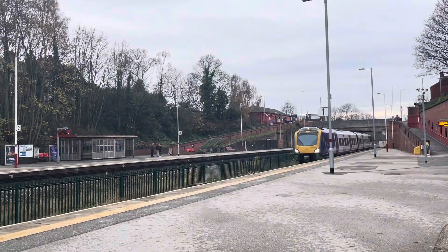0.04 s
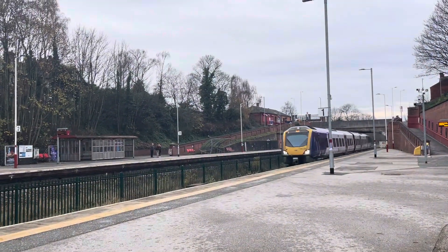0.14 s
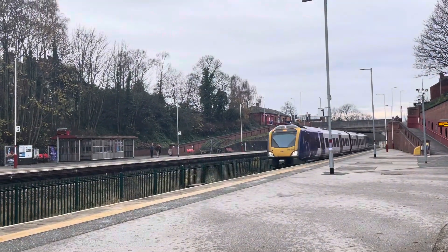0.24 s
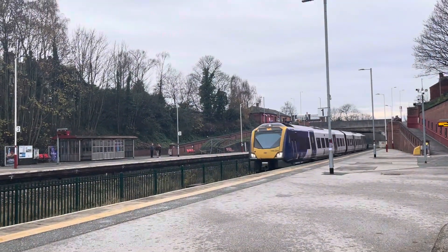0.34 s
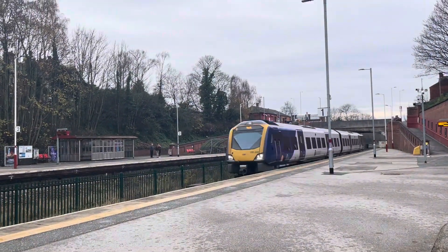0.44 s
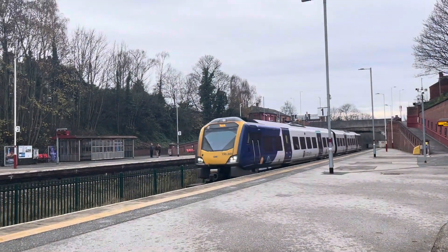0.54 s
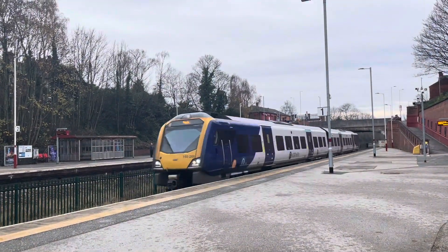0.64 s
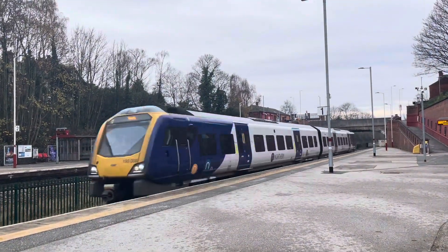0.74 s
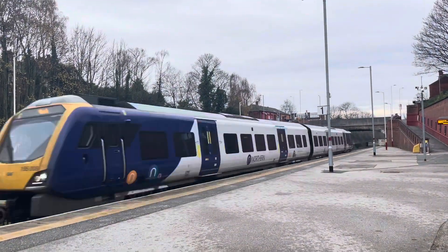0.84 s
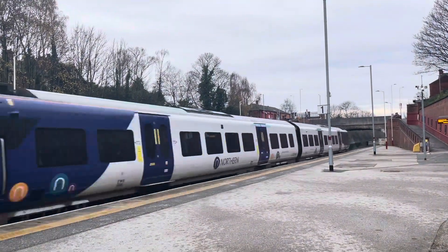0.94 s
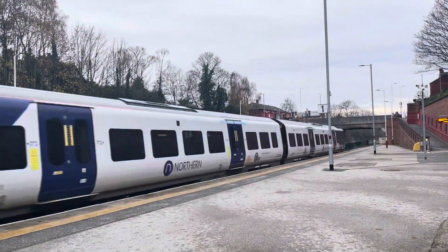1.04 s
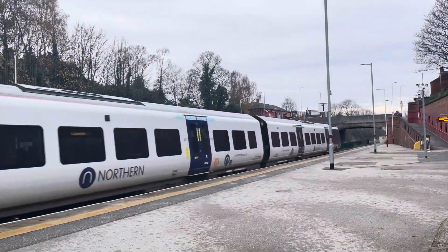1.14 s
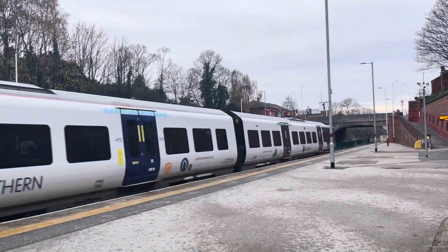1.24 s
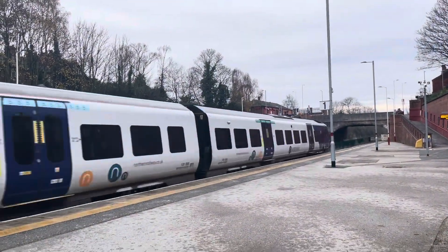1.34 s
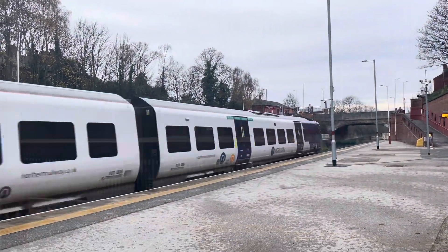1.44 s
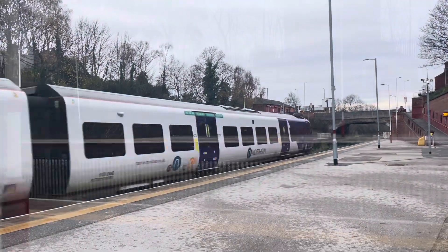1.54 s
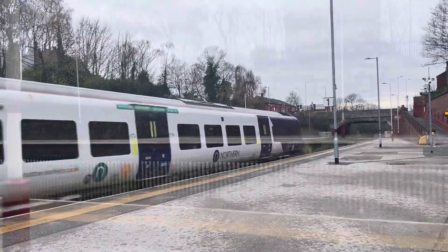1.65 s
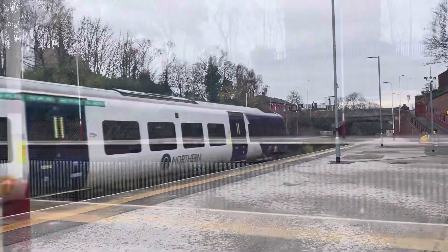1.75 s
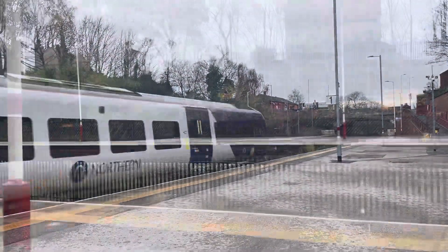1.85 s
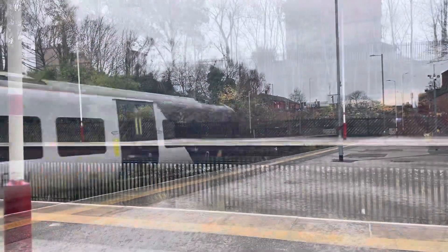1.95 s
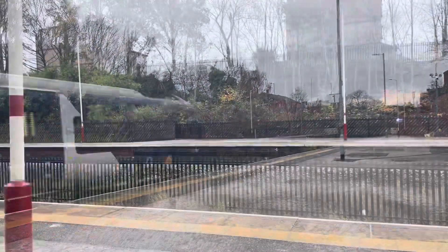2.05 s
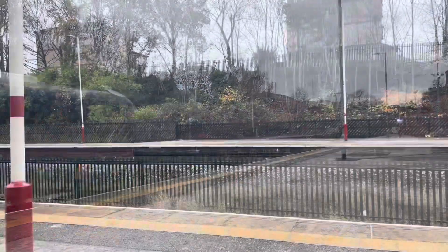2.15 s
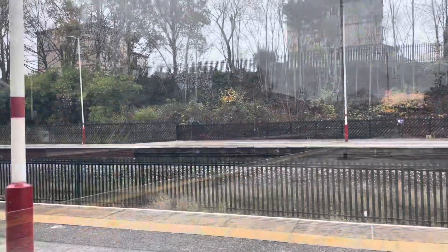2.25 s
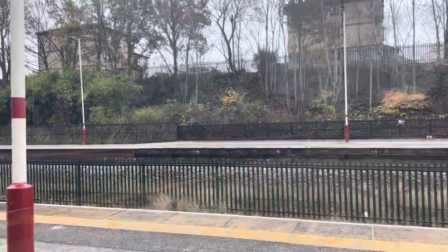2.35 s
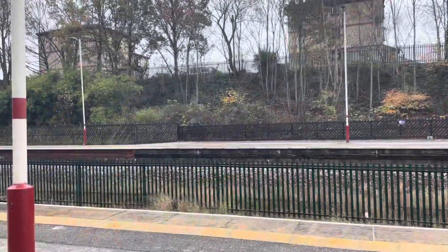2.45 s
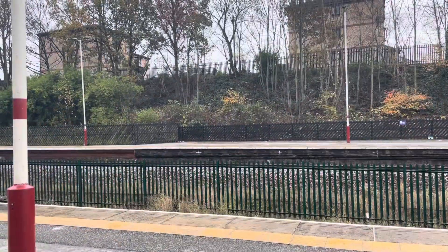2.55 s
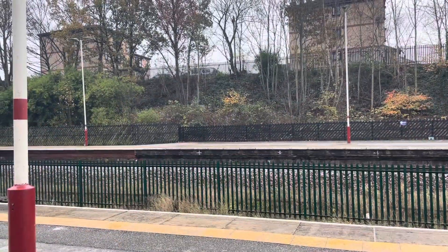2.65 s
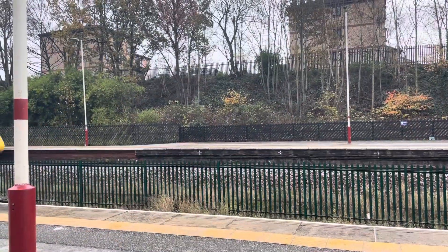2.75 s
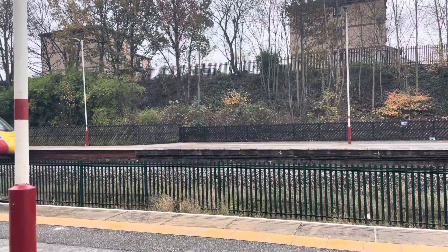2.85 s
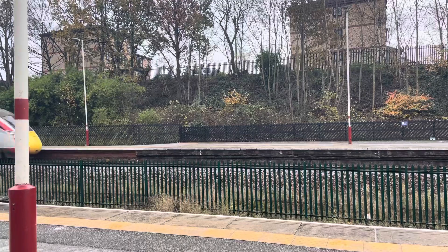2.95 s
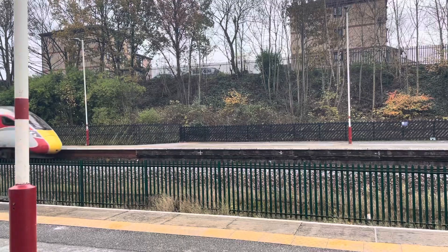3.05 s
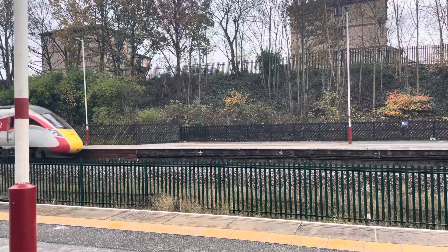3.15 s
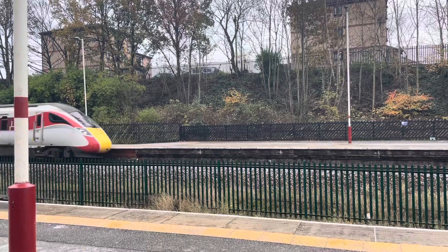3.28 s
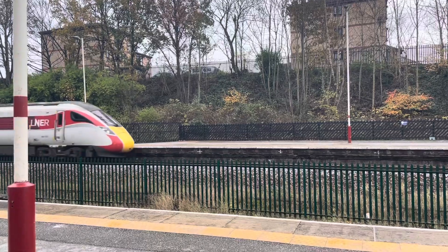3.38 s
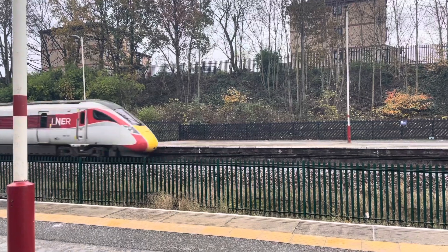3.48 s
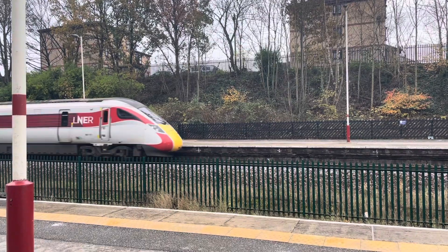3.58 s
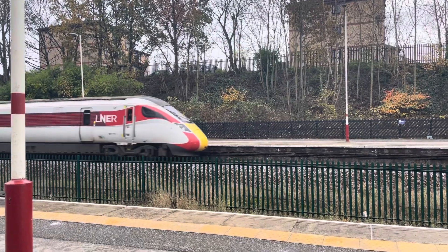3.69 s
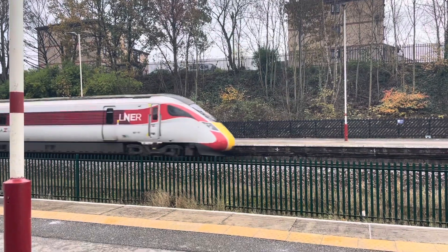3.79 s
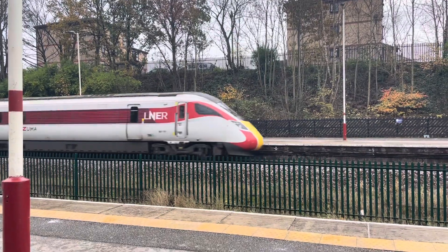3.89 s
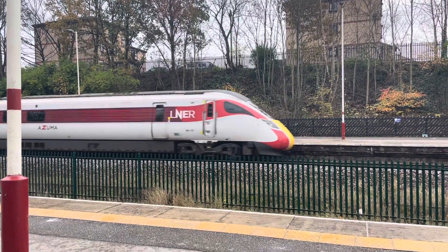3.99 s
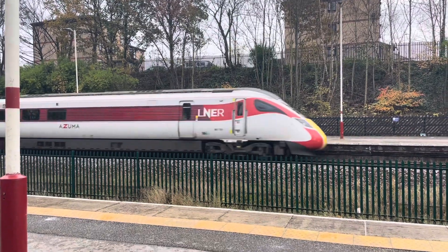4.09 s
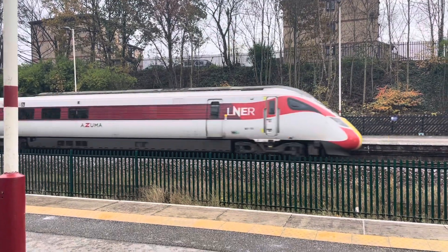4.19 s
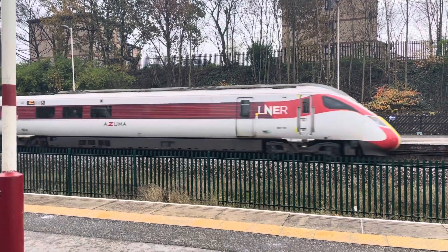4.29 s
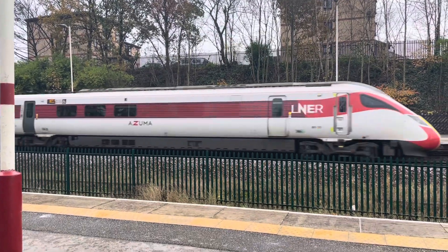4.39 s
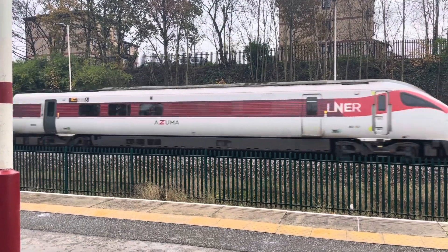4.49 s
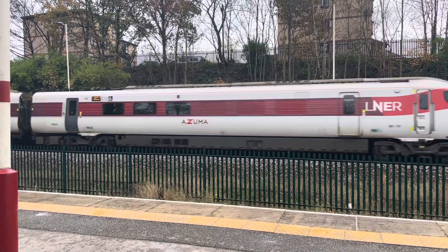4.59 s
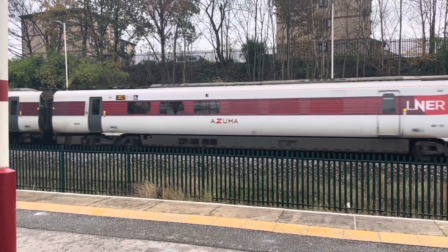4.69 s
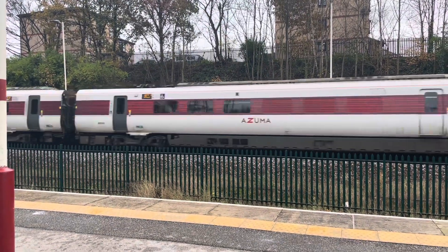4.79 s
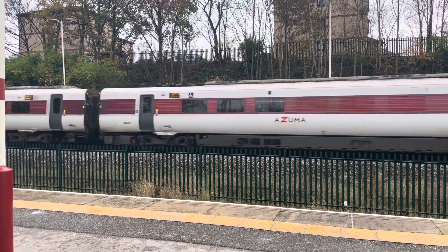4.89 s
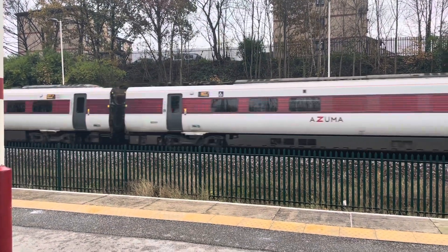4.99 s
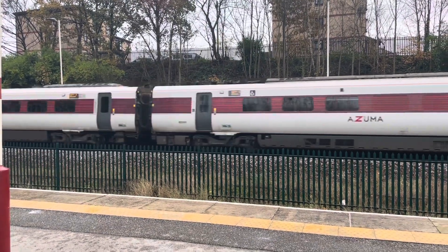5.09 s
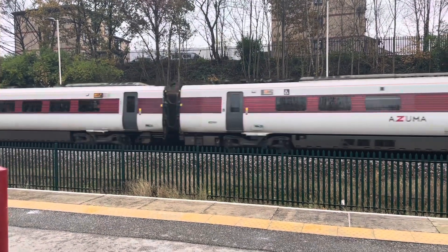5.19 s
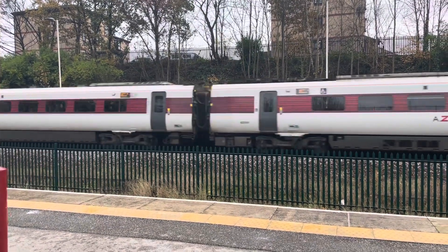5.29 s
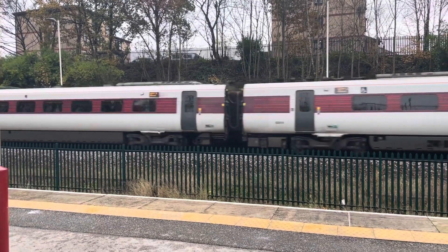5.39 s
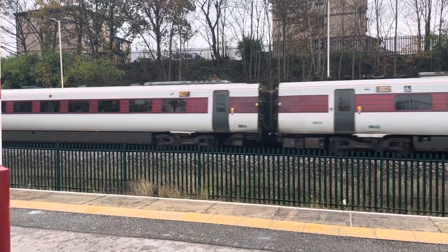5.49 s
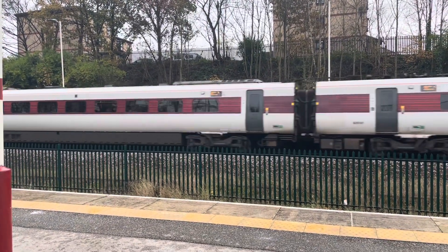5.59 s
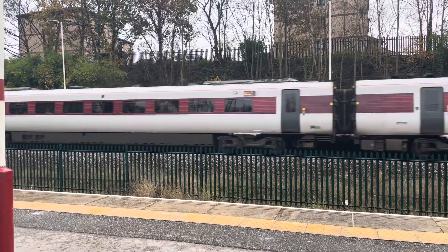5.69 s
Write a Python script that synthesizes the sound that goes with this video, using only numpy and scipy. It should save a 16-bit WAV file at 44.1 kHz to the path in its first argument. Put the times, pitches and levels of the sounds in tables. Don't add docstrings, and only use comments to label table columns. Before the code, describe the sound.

Two train passes joined by a crossfade, heard outdoors from a platform on a slightly compressed stereo phone microphone. First, a close diesel swells into thunderous rolling noise, with engines dropping in pitch and brief metallic rings. After a quiet dip, a farther electric train approaches with an even, rough rumble, low beating motor hum and faint singing wheel tones, still passing as it ends.

```python
import sys
import numpy as np
from scipy import signal
from scipy.fft import rfft, irfft, next_fast_len
from scipy.io import wavfile
from scipy.ndimage import uniform_filter1d

SR = 44100
rng = np.random.default_rng(int(sys.argv[2]) if len(sys.argv) > 2 else 0)


def decibels_to_gain(level_db):
    exponent = np.asarray(level_db, float) / 20
    return 10 ** exponent


def transcribe(signal):
    frames = np.atleast_2d(signal).T
    limited = np.clip(frames, -1, 1)
    pcm = np.round(limited * 32767).astype(np.int16)
    wavfile.write(sys.argv[1], SR, pcm)


N = 252693
T = np.arange(N) / SR
PADDED = next_fast_len(N)
HZ = np.fft.rfftfreq(PADDED, 1 / SR)

# start_s, roar_db, rumble_db, wheel_db, hiss_db
FAR_LEVELS = [(2.2, -43, -44, -52, -51), (2.45, -44.5, -45.5, -50, -59.5), (2.75, -39, -39.5, -47, -53),
              (3.0, -40, -38.5, -45, -55.5), (3.2, -36, -37, -45, -53), (3.5, -37.5, -34.5, -44.5, -51.5),
              (3.8, -35, -41, -40.5, -50), (4.1, -33, -34, -39, -47.5), (4.4, -33.5, -31.5, -39.5, -46.5),
              (4.7, -32.5, -33.5, -39, -45), (4.95, -37, -31, -37.5, -46.5), (5.2, -31, -31, -38, -43.5),
              (5.5, -31, -32, -36, -46), (5.73, -32, -32, -38.5, -42)]
# start_s, roar_db, rumble_db, wheel_db, hiss_db
NEAR_LEVELS = [(0.0, -30, -27, -41, -50), (0.04, -33.5, -23, -39, -48), (0.27, -31.5, -23, -38.5, -46.5),
               (0.9, -24, -18, -32, -35.5), (0.93, -26, -19, -34.5, -34), (0.98, -22.5, -16, -29, -34),
               (1.07, -26.5, -15.5, -30, -31.5), (1.18, -23.5, -15, -28.5, -30),
               (1.23, -25.5, -16, -25.5, -35), (1.31, -18.5, -16, -32, -32.5),
               (1.45, -24.5, -19.5, -27, -32), (1.47, -18.5, -22, -33.5, -31),
               (1.55, -22.5, -18.5, -27.5, -31.5), (1.81, -27, -21, -32, -36.5),
               (1.95, -30, -20, -35.5, -41.5), (2.25, -36.5, -46, -47.5, -52), (2.37, -43, -45.5, -50, -60),
               (2.45, -49, -45, -62, -69)]
BAND_EDGES_HZ = (330, 1250, 2750)
# pitch_hz, level_db (per Hz)
FAR_MID = [(20, -55), (48, -14.5), (120, -16), (228, -18), (410, -20.5), (490, -15), (800, -12.5),
           (1150, -17), (1300, -27), (2450, -25), (2750, -30), (5630, -28), (7300, -41)]
FAR_SIDE = [(30, -26), (175, -30), (400, -22), (700, -13), (1150, -17.5), (1350, -23.5), (2500, -30),
            (3600, -28.5), (4600, -31), (5300, -31), (5700, -25), (7400, -28.5), (8500, -33.5),
            (10400, -48)]
NEAR_MID = [(20, -32), (40, -4.5), (70, -4.5), (113, -10.5), (234, -11.5), (378, -17.5), (643, -20),
            (1000, -19), (1290, -26.5), (2680, -21), (2800, -25), (5800, -21), (7300, -37.5)]
NEAR_SIDE = [(30, -34), (71, -27), (200, -19), (450, -20), (921, -18.5), (1300, -20.5), (4730, -23.5),
             (5600, -20.5), (6850, -19), (10400, -32)]
# pitch_hz, level_db (per Hz)
AIR_MID = [(8000, -6), (9000, -3), (10700, 0), (11500, -5), (12300, -8), (13000, -15), (13500, -26)]
AIR_SIDE = [(11900, -14), (12600, -9), (13500, -3), (15000, 0), (15900, -3)]
# pitch_hz, share_0_to_1
PORT_LEAD = [(60, 0), (250, 0.76), (600, .7), (1200, 0.74), (2000, 0.1), (3300, .5), (5000, 0)]
# pitch_hz, left_minus_right_db
PORT_LEAN = [(60, -1), (110, -1.5), (200, -2), (370, 0), (670, 1), (1230, 1.5), (2250, 0.5), (4110, 3.5),
             (7520, -1), (13800, 0.0)]
# start_s, hum_hz, first_partial_db, second_partial_db, third_partial_db
MOTOR_HUM = [(2.3, 237, -47, -54.5, -45), (2.65, 235.9, -46.5, -46, -63), (3.07, 234.1, -45, -49, -46),
             (3.47, 235.8, -47, -47.5, -48), (3.49, 234.6, -42, -68, -56), (3.58, 231.1, -47.5, -46, -40),
             (3.77, 232.3, -41.5, -35.5, -53), (4.18, 232.9, -35, -35.5, -41.5), (4.31, 230, -44, -47, -45),
             (4.38, 234, -30, -42, -53), (4.45, 229.7, -37, -48, -43), (4.74, 228.2, -37.5, -41.5, -42),
             (4.85, 236.5, -39, -36, -46), (4.89, 234.4, -49, -58, -44.5), (4.93, 235.6, -31.5, -34, -42),
             (5.14, 233.1, -37, -42.5, -37), (5.42, 233.9, -31, -37, -55), (5.48, 229.5, -47, -42, -30),
             (5.61, 231.3, -23, -39, -52), (5.65, 233.3, -43, -45, -33), (5.73, 233.3, -34, -41, -33)]
FAR_MODES_HZ = [59, 720, 930, 2040, 2400, 3030, 3890, 4750]
# width_hz, level_db (against the roar), side_minus_mid_db
FAR_MODES = [(12, -8.5, -28), (90, -5, -14), (50.6, -9, -6), (45, -14.5, -6), (200, -22, -11),
             (250, -16.5, -1), (160, -25, -6), (350, -22, -14)]
# middle_s, length_s, pitch_hz, width_hz
RINGS = [(.64, .26, 955, 30), (1.08, .2, 910, 40), (1.0, .15, 490, 20), (1.26, .34, 465, 16),
         (1.53, .2, 438, 12), (1.56, .16, 468, 10), (1.96, .2, 455, 14), (1.55, .3, 900, 90),
         (1.17, .4, 2370, 300), (1.5, .2, 2400, 350), (1.68, .25, 2250, 300), (1.63, .08, 2120, 45),
         (1.3, .35, 1780, 80), (1.45, .15, 1580, 30), (1.08, .2, 5600, 300), (1.42, .3, 5650, 140),
         (1.62, .15, 5900, 200), (2.35, .5, 2100, 60), (3.0, .45, 2090, 60), (4.49, .06, 3190, 30),
         (4.575, .07, 3200, 25), (4.22, .25, 3900, 110), (5.13, .15, 3880, 90), (5.55, .3, 3870, 110)]
# level_db, side_minus_mid_db
RING_LEVELS = [(-32, -14), (-39, 11), (-31, -6), (-24.5, -1), (-21.5, 0), (-26.5, 3), (-30.5, 0),
               (-37.5, 10), (-26.5, -17), (-28.5, -8), (-32.5, -23), (-31, -15), (-34.5, -5), (-36, -5),
               (-42, -5), (-46, -7), (-41, -5), (-52, -9), (-54, -6), (-50, -6), (-43, -8), (-51.5, -13),
               (-48, -6), (-48, -10)]
# start_s, pitch_hz, level_db
BLOWERS = [
    [(.8, 11000, -64), (1.05, 10900, -47), (1.25, 10600, -48), (1.35, 10300, -42.5), (1.5, 9800, -47.5),
     (1.7, 9600, -62)],
    [(1.45, 11000, -58), (1.7, 10800, -49), (1.87, 10500, -47), (2.0, 10000, -49), (2.1, 9700, -55),
     (2.3, 9500, -75)],
]
# start_s, firing_hz, level_db
ENGINES = [
    [(0, 82, -30), (.4, 82, -29), (.65, 80, -27), (.82, 72, -25), (1.1, 69, -28), (1.4, 69, -40)],
    [(.9, 82, -30), (1.15, 82.5, -21), (1.3, 82, -17), (1.48, 81, -17), (1.6, 78, -24), (1.75, 71, -27),
     (1.95, 70, -24), (2.15, 69.5, -33), (2.45, 69, -46)],
]
# multiple_of_firing, level_db
ENGINE_ORDERS = [(.5, -16.5), (.75, -24), (1, 0), (2, -11), (2.501, -11.5), (3, -12)]
# channel (0 mid, 1 side), from_hz, to_hz, quiet_kept_share, loud_kept_share
HOLES = [(0, 6550, 6900, .85, .8), (0, 6900, 7300, .12, .25), (0, 7300, 8250, 0, 0),
         (0, 12500, 13600, .6, .5), (0, 8250, 8600, .7, .8), (0, 8600, 8950, .85, .95),
         (1, 9650, 10300, .15, .75), (1, 10300, 11900, 0, 0), (1, 11900, 12500, .08, .08),
         (1, 12500, 13100, .7, .8)]


def unit(x):
    return x / np.sqrt(np.mean(x ** 2))


def curves(table):
    start_s, *columns = np.transpose(table)
    return [np.interp(T, start_s, column) for column in columns]


def fade(start_s, end_s):
    return np.clip((T - start_s) / (end_s - start_s), 0, 1)


def sounding(rows):
    return (T >= rows[0][0]) * (T < rows[-1][0])


def walk(rate_hz):
    hold = int(SR / rate_hz)
    held = np.repeat(rng.standard_normal(N // hold + 1), hold)
    return 1.28 * uniform_filter1d(uniform_filter1d(held, hold), hold)[:N]


def in_time(spectrum):
    return irfft(spectrum, PADDED)[..., :N]


def colour(table):
    hz, db = np.transpose(table)
    gain = decibels_to_gain(np.interp(np.log(HZ + 1), np.log(hz), db, left=-150, right=-150))
    return rfft(rng.standard_normal(PADDED)) * gain / np.sqrt(np.mean(gain ** 2))


def mode(hz, width_hz):
    pole = np.exp(-np.pi * np.clip(width_hz, 1, 2000) / SR)
    two_poles = np.convolve([1, -pole ** 1.5], [1, -pole ** 1.5])
    slow = signal.lfilter([1], two_poles, rng.standard_normal((2, N)))
    carrier = np.exp(2j * np.pi * np.cumsum(hz * np.ones(N)) / SR)
    return (unit(slow[0]) + 1j * unit(slow[1])) * carrier


def placed(z, side_db):
    ahead_rad = 1.35
    return np.array([z.real, decibels_to_gain(side_db) * (z * np.exp(1j * ahead_rad)).real])


def rolling(levels, mid, side, side_db, air_db, flicker_db):
    roar_db, rumble_db, wheel_db, hiss_db = uniform_filter1d(curves(levels), SR // 14)
    centre, own = colour(mid), colour(side)
    lead = np.clip(np.interp(HZ, *np.transpose(PORT_LEAD)), 0, 1)
    early = 1j * centre / (np.abs(centre) + 1e-18) * np.abs(own)
    both = np.array([centre, lead * early + np.sqrt(1 - lead ** 2) * own])
    slopes = [1 / (1 + (HZ / edge) ** 8) for edge in BAND_EDGES_HZ]
    shares = np.diff(np.array([0 * HZ] + slopes + [1 + 0 * HZ]), axis=0)
    bands = [in_time(both * share) for share in shares]
    bands = [band / np.std(band[0]) * decibels_to_gain([0 * T, side_db]) for band in bands]
    air = in_time(np.array([colour(AIR_MID), colour(AIR_SIDE)]))
    bands[3] = bands[3] + decibels_to_gain(np.array(air_db))[:, None] * air
    out = 0
    for band, db in zip(bands, (rumble_db, roar_db, wheel_db, hiss_db)):
        out = out + band * decibels_to_gain(db + flicker_db * walk(12))
    return out


def far_motors():
    hz, *partials = curves(MOTOR_HUM)
    turn = 2 * np.pi * np.cumsum(uniform_filter1d(hz, SR // 2)) / SR
    out = 0
    for k, db, side_db in zip((1, 2, 3), partials, (-12, -5, -4)):
        steady = np.sqrt(2) * np.exp(1j * k * turn)
        beating = 0.65 * mode(k * hz, 9.5 * k)
        out = out + placed((steady + beating) * decibels_to_gain(db - 1.0), side_db)
    return out


def far_modes():
    roar_db = uniform_filter1d(curves(FAR_LEVELS)[0], SR // 2)
    out = 0
    for hz, (width_hz, db, side_db) in zip(FAR_MODES_HZ, FAR_MODES):
        swell = decibels_to_gain(roar_db + db + 1.5 * walk(4.16))
        out = out + placed(mode(hz, width_hz) * swell, side_db)
    return out


def far_train():
    noise = rolling(FAR_LEVELS, FAR_MID, FAR_SIDE, -5 + 0 * T, air_db=(-14, -20), flicker_db=1.0)
    return (noise + far_motors() + far_modes()) * fade(1.65, 2.4)


def rings():
    out = 0
    for (middle_s, length_s, hz, width_hz), (db, side_db) in zip(RINGS, RING_LEVELS):
        near = np.exp(-(2 * (T - middle_s) / length_s) ** 4)
        pure = np.exp(2j * np.pi * hz * T) * (width_hz < 50)
        song = (mode(hz, width_hz) + pure) * near
        level = np.sqrt(2 * np.sum(near ** 2) / np.sum(np.abs(song) ** 2)) * decibels_to_gain(db)
        out = out + placed(song * level, side_db)
    return out


def blowers():
    out = 0
    for rows in BLOWERS:
        hz, db = curves(rows)
        whistle, rush = mode(hz, 300), mode(hz - 500, 1800)
        out = out + (whistle + rush) * decibels_to_gain(db) * sounding(rows)
    return placed(out, -40)


def engines():
    out = 0
    for rows in ENGINES:
        hz, db = curves(rows)
        turn = 2 * np.pi * np.cumsum(hz * (1 + 0.0037 * walk(6.16))) / SR
        drone = 0
        for order, order_db in ENGINE_ORDERS:
            waver_db = 1.5 * (order != 1) * walk(7)
            drone = drone + decibels_to_gain(order_db + waver_db) * np.exp(1j * (order * turn + 7 * rng.random()))
        out = out + np.sqrt(2) * drone * decibels_to_gain(db) * sounding(rows)
    return placed(out, -20)


def near_rolling():
    side_db = -6 + 4 * fade(0.66, 2.15)
    noise = rolling(NEAR_LEVELS, NEAR_MID, NEAR_SIDE, side_db, air_db=(-11, -17), flicker_db=0.78)
    return noise * (1 - fade(2.57, 2.87))


def scene():
    mid, side = decibels_to_gain(-1.0) * (far_train() + near_rolling()) + rings() + blowers() + engines()
    lean_db = np.interp(HZ, *np.transpose(PORT_LEAN))
    lean = np.tanh(np.log(decibels_to_gain(lean_db)) / 2) * (HZ < 7600)
    side = side + in_time(lean * rfft(mid, PADDED))
    return np.array([mid + side, mid - side])


def drop_bands(x):
    frame = 2048
    pair = np.array([x[0] + x[1], x[0] - x[1]]) / 2
    spectra = rfft(pair, PADDED)
    loud = uniform_filter1d(x[0] ** 2, SR // 2)[::frame] > decibels_to_gain(-44)
    for k, lo_hz, hi_hz, quiet_share, loud_share in HOLES:
        shut = rng.random(len(loud)) >= np.where(loud, loud_share, quiet_share)
        gate = uniform_filter1d(np.repeat(1. * shut, frame), 600)[:N]
        pair[k] -= gate * in_time(spectra[k] * (HZ >= lo_hz) * (HZ < hi_hz))
    return np.array([pair[0] + pair[1], pair[0] - pair[1]])


def low_pass(x):
    return signal.sosfilt(signal.butter(12, 15800, fs=SR, output="sos"), x)


def record(dry):
    thinned = signal.sosfilt(signal.butter(2, 38, "highpass", fs=SR, output="sos"), dry)
    rounded = np.tanh(thinned / 1.1) * 1.1
    mix = drop_bands(rounded)
    return low_pass(mix)


dry = scene()
out = record(dry)
transcribe(out)
```